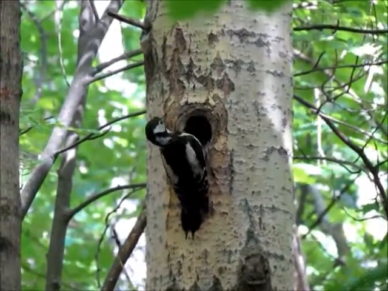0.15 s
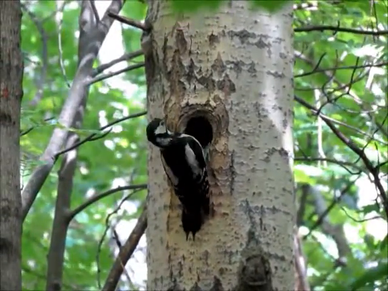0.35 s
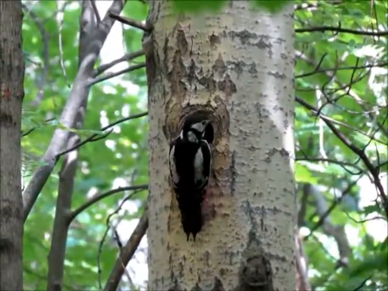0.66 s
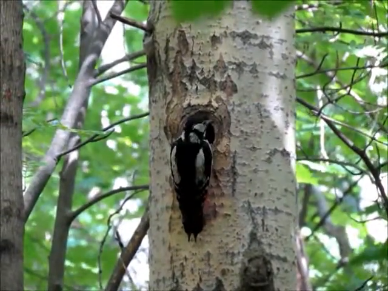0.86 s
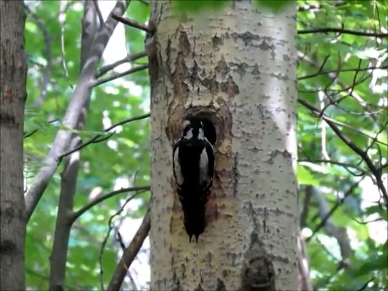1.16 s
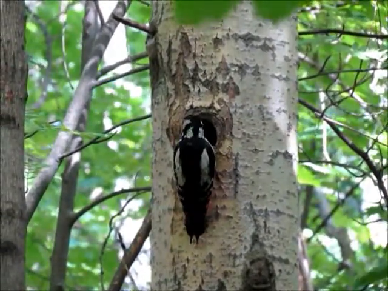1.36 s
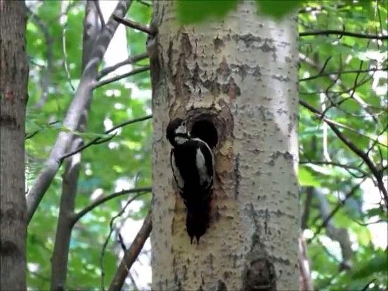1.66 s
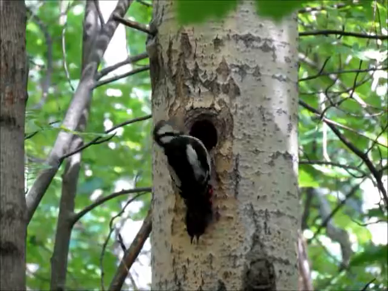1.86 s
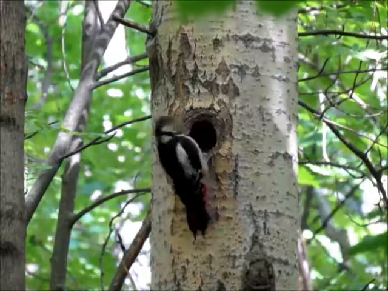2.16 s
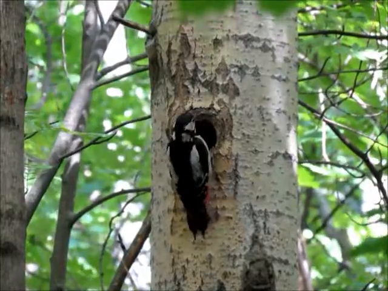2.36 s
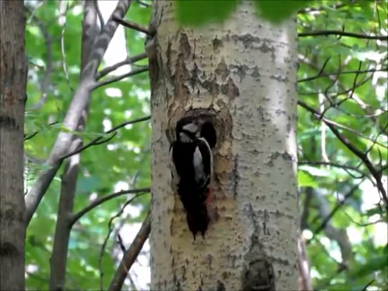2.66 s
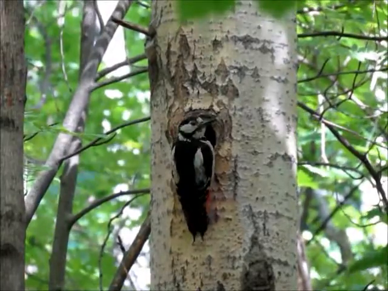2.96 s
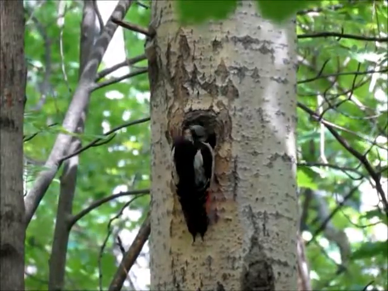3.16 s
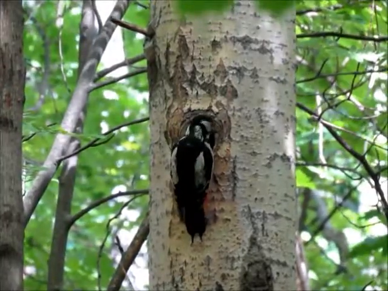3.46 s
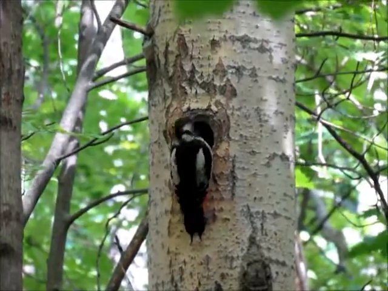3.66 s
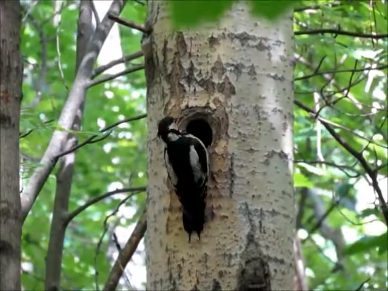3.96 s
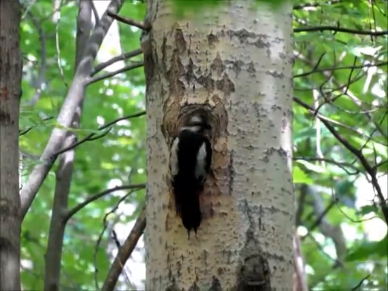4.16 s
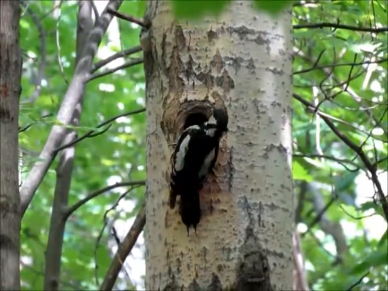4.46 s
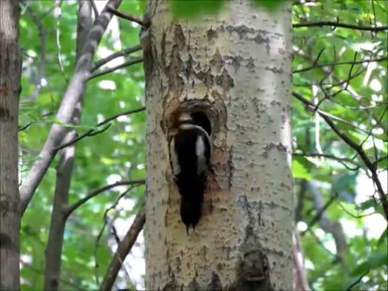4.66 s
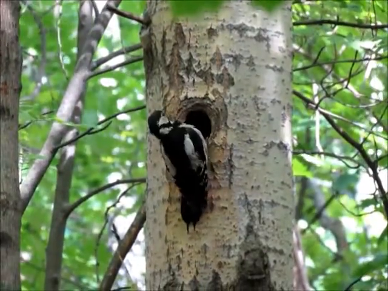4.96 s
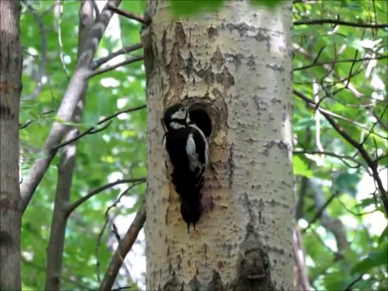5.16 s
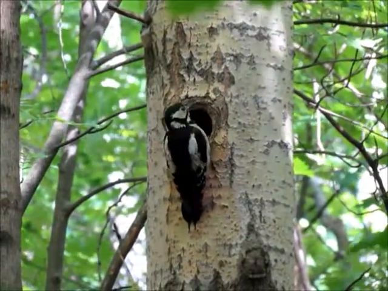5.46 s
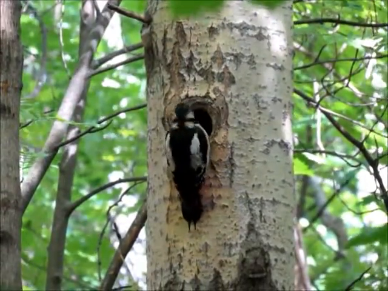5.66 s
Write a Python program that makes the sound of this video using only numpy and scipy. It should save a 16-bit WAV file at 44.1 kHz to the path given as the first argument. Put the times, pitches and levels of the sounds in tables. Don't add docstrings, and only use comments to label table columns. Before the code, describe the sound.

Two woodpecker nestlings beg without pause, each giving about six short, arched chirps a second, drifting in and out of step. A parent on the trunk adds a much louder, clipped call roughly every 0.6 to 1.1 seconds. Surrounding trunks return a brief, diffuse echo. Behind lies a soft, steady wash of distant traffic and leaves. Stereo microphone, birds near the centre, slightly left.

```python
import sys
import numpy as np
from scipy import signal
from scipy.fft import rfft, irfft
from scipy.io import wavfile
from scipy.ndimage import uniform_filter1d

SR = 44100
rng = np.random.default_rng(int(sys.argv[2]) if len(sys.argv) > 2 else 0)


def rack_gain(trim_db):
    fader = np.asarray(trim_db, float)
    return 10 ** (fader / 20)


def file_out(sig):
    cols = np.atleast_2d(sig).T
    lim = np.clip(cols, -1, 1)
    pcm = np.round(lim * 32767).astype(np.int16)
    wavfile.write(sys.argv[1], SR, pcm)


N = 256662


def wobble(n, hz):
    k = max(int(SR / hz), 1)
    smooth = uniform_filter1d(uniform_filter1d(rng.standard_normal(n), k), k)
    return smooth * np.sqrt(1.5 * k)


def bird(chirps, partials, arch, breath, rough, swell, grace_db=-99):
    rise_drop, fall_drop, deepest, flat = arch
    full, attack, silent, fade = breath
    jitter, shimmer_db, air_db, air_hz = rough
    out = np.zeros(N + SR)
    t = (np.arange(4096) - 2048) / SR
    n = len(t)
    for top_s, top_hz, rise, fall, db, effort_db in chirps:
        u = np.where(t < 0, t / rise, t / fall)
        drop = np.where(u < 0, rise_drop, fall_drop) * np.abs(u) ** flat
        tension = 1 - deepest * np.tanh(drop / deepest)
        hz = top_hz * tension
        phase = 2 * np.pi * np.cumsum(hz * (1 + jitter * wobble(n, hz=382))) / SR

        tone = np.zeros(n)
        for k, (partial_db, share) in enumerate(partials, 1):
            level = rack_gain(partial_db + share * effort_db + shimmer_db * wobble(n, hz=244))
            slack = tension ** (swell * (k - 1))
            in_range = k * hz < .4 * SR
            tone += level * slack * in_range * np.sin(k * phase)
        tone *= 1 + rack_gain(air_db) * wobble(n, hz=air_hz)
        tone *= np.clip((u - full) / attack + 1, 0, 1) ** 2
        tone *= np.clip((silent - u) / fade, 0, 1) ** 2

        lead = np.clip((-t - rise) / .022, 0, 1)
        grace_hz = top_hz * (.8 + .33 * lead + .03 * wobble(n, hz=500))
        grace = np.sin(2 * np.pi * np.cumsum(grace_hz) / SR) * np.sin(np.pi * lead ** .5)
        grace *= rack_gain(grace_db + 3.0 * wobble(n, hz=300))

        start = int(top_s * SR)
        out[start:start + n] += rack_gain(db) * (tone + grace)
    return out[2048:2048 + N]


def begging(bouts, rises, presses):
    chirps = []
    for bout, rise, (rest_db, lost_db, steep) in zip(bouts, rises, presses):
        for top_s, hz, length, effort_db in bout:
            db = rest_db - lost_db * (max(effort_db, 0) / 10) ** steep
            chirps.append((top_s, hz, rise * length, (1 - rise) * length, db, effort_db))
    return chirps


# pitch share, level in dB, turbulent air in dB, air bandwidth in Hz
CHICK_ROUGH = (.007, 2.2, -18, 7000)


def near_chick():
    # top of the arch in seconds, top pitch in Hz, length in seconds,
    # effort in dB that brightens the overtones
    eager = [(.1152, 2456, 0.064, 20), (.2694, 2480, .028, 16.5), (.4415, 2506, 0.041, 15),
             (.6147, 2506, 0.046, 13), (.7984, 2510, 0.049, 7), (.9719, 2634, 0.061, 12),
             (1.1532, 2633, 0.068, 10.5), (1.3448, 2543, 0.052, 11), (1.5177, 2517, 0.055, 10),
             (1.7027, 2669, 0.067, 13.5), (1.8855, 2663, .063, 13), (2.0698, 2645, .07, 15),
             (2.2511, 2612, 0.073, 12.5), (2.4311, 2630, 0.052, 9.5), (2.611, 2436, .04, 7.5),
             (2.7796, 2530, 0.045, 10.5), (2.9658, 2600, 0.039, 12)]
    tiring = [(3.1455, 2510, 0.055, 8), (3.3248, 2483, 0.049, 6.3), (3.5034, 2357, 0.052, -1.1),
              (3.6727, 2340, 0.029, 1.1), (3.85, 2586, 0.062, 10), (4.0227, 2576, .053, 10.5),
              (4.2034, 2608, 0.055, 11.5), (4.3867, 2635, 0.054, 8.5), (4.568, 2630, 0.061, 11.5),
              (4.7499, 2623, 0.064, 12.5), (4.9343, 2642, .07, 16), (5.1214, 2534, 0.055, 10),
              (5.306, 2513, 0.033, -0.5), (5.4818, 2348, .036, -7), (5.6472, 2487, 0.043, 13)]
    # level in dB, share of the effort it takes [0-1]
    partials = [(3, 0), (3.5, 0), (1, 0.74), (-10, 1), (-9.5, 0.56), (-20.5, 0.61)]
    chirps = begging((eager, tiring), rises=(.61, .48), presses=[(-36, 1.75, 1.14), (-37.5, 1.53, 1.4)])
    return bird(chirps, partials, arch=(.21, .33, .48, 2.5), breath=(-.75, .45, 2.2, 1.8),
                rough=CHICK_ROUGH, swell=1.9, grace_db=-10)


def deep_chick():
    # top of the arch in seconds, top pitch in Hz, length in seconds, effort in dB that
    # brightens the overtones; the chirps at .2945 and 3.0684 s are a third chick's
    eager = [(.122, 2710, 0.053, 8), (.2945, 2305, .025, 15), (.302, 2680, 0.066, 12.5),
             (.477, 2670, 0.077, 12), (.65, 2674, 0.073, 9.5), (.824, 2723, 0.069, 6.1),
             (.994, 2760, 0.06, 7.3), (1.176, 2740, 0.054, 9.4), (1.3601, 2800, 0.059, 12),
             (1.5265, 2756, 0.061, 9.1), (1.7012, 2627, 0.075, 23), (1.8841, 2674, 0.043, 19),
             (2.0351, 2660, 0.037, 9.5), (2.2122, 2710, 0.035, 6), (2.3908, 2760, 0.04, 5.7),
             (2.5632, 2714, 0.06, 4.3), (2.7435, 2817, 0.057, 3.8)]
    tiring = [(2.909, 2836, .055, 2), (3.0684, 2310, 0.025, 20), (3.0904, 2762, 0.057, 1),
              (3.2519, 2607, 0.067, 5), (3.42, 2486, 0.044, 0), (3.5859, 2460, 0.051, 0),
              (3.7824, 2290, .044, -5), (3.9403, 2380, .045, -4), (4.1286, 2270, 0.039, -5.5),
              (4.5239, 2520, 0.05, -4), (4.7014, 2404, 0.047, -7.2), (4.8905, 2443, .036, -7),
              (5.0496, 2415, 0.038, -4), (5.2266, 2328, 0.047, -10), (5.3934, 2580, .047, -1.5),
              (5.6006, 2587, 0.063, -2.5), (5.772, 2630, 0.056, 4.5)]
    # level in dB, share of the effort it takes [0-1]
    partials = [(-1.5, 0.071), (-0.5, 0.97), (-10.5, 1), (-23, 0.96), (-26, 0.93), (-44, .3)]
    chirps = begging((eager, tiring), rises=(.55, .47), presses=[(-37.5, 3.8, 2), (-37, 5.2, 2.1)])
    return bird(chirps, partials, arch=(.21, .33, .55, 3), breath=(-.7, .5, 1.5, .9),
                rough=CHICK_ROUGH, swell=2.4)


def parent_on_trunk():
    # top of the arch in seconds, top pitch in Hz, rise in seconds, level in dB, effort in dB
    calls = [
        (0.1632, 2267, 0.016, -16.5, -6.5),
        (1.306, 2352, .018, -17, -9.5),
        (2.2629, 2090, 0.025, -20.5, -7),
        (2.936, 2250, 0.015, -16.5, -5),
        (3.5334, 2397, 0.015, -16.5, -6),
        (4.2988, 2344, .018, -16, -10.1),
        (5.1788, 2299, 0.014, -17.5, -7),
        (5.8141, 2360, .014, -15.5, -7.5),
    ]
    # level in dB, share of the effort it takes [0-1]
    partials = [(0, 1), (0, 0), (-6, 1.0), (-28, .2), (-33, .2), (-37, .1)]
    fall_s = .0158
    chirps = [(top_s, hz, rise, fall_s, db, effort_db) for top_s, hz, rise, db, effort_db in calls]
    voice = bird(chirps, partials, arch=(.46, .46, .63, 3.5), breath=(-.3, 1.6, 1.5, .6),
                 rough=(.005, 2.6, -16.5, 16000), swell=.2)
    return signal.sosfilt(signal.butter(4, 2000, "high", fs=SR, output="sos"), voice)


def trunks(x, close, far_db, far_t60, far_hz, alike):
    near_db, build_s, near_t60, thin_hz = close
    t = np.arange(SR) / SR
    mid, side = rng.standard_normal((2, 2, SR))
    shared = np.sqrt(np.clip(alike, 0, 1)) * mid[:, None]
    apart = np.sqrt(np.clip(1 - alike, 0, 1)) * side[:, None] * np.array([[1], [-1]])
    ears = shared + apart
    near = rack_gain(near_db - 60 * t / near_t60) * ears[0] * np.clip(t / build_s, 0, 1) ** 2
    far = rack_gain(far_db - 60 * t / far_t60) * ears[1] * np.clip(t / 0.0061, 0, 1)
    far = signal.lfilter(*signal.butter(1, far_hz, fs=SR), far)
    echo = signal.lfilter(*signal.butter(2, thin_hz, "high", fs=SR), near + far)
    return signal.fftconvolve(x[None], echo, axes=1)[:, :N]


def on_log_axis(table, hz):
    f, v = np.transpose(table)
    return np.interp(np.log(np.maximum(hz, 1)), np.log(f), v)


def hush():
    # frequency in Hz, level in dB per Hz
    colour = [(15, -44), (25, -4), (64, -1), (349, 0), (848, 6), (1750, -7), (2490, -9.5), (3000, -11),
              (4500, -9), (5140, -11.5), (5580, -10), (7300, -13), (8350, -19.5), (11800, -24),
              (15500, -35)]
    # frequency in Hz, likeness of left and right [0-1]
    likeness = [(30, .8), (80, 0.82), (160, 0.63), (500, 0.46), (2000, 0.16), (12000, 0.13)]
    # frequency in Hz, left minus right in dB
    lean = [(30, 2.5), (200, 2), (700, 2.5), (1500, 0.7), (12000, 1.5)]
    hz = np.fft.rfftfreq(N, 1 / SR)
    mid, side = rfft(rng.standard_normal((2, N)))
    alike = np.clip(on_log_axis(likeness, hz), 0, 1)
    sign = np.array([[1], [-1]])
    ears = np.sqrt(1 + alike) * mid + sign * np.sqrt(1 - alike) * side
    ears = ears * rack_gain(sign * on_log_axis(lean, hz) / 2)
    rumble_db = 6 * np.exp(-(np.log(np.maximum(hz, 1) / 63) / 0.29) ** 2)
    out = irfft(ears * rack_gain(on_log_axis(colour, hz) + rumble_db), N)
    out = out * rack_gain(0.45 * wobble(N, hz=6.5))
    return out * rack_gain(-42.5) / np.sqrt(np.mean(out.mean(axis=0) ** 2))


def scene():
    chicks = near_chick() + deep_chick()
    parent = parent_on_trunk()
    # level dB, build-up s, t60 s, thin below Hz
    chick_echo = trunks(chicks, close=(-28, .006, .12, 1500),
                        far_db=-39.0, far_t60=0.32, far_hz=11000, alike=0.61)
    parent_echo = trunks(parent, close=(-24.5, .008, .14, 2600),
                         far_db=-34.5, far_t60=0.46, far_hz=13000, alike=0.8)
    direct = (chicks + parent) * rack_gain(np.array([[.15], [-.15]]))
    return direct + chick_echo + parent_echo + hush()


def band_limit(x):
    return signal.sosfilt(signal.butter(12, 15710, fs=SR, output="sos"), x)


def record(dry):
    return band_limit(dry)


dry = scene()
out = record(dry)
file_out(out)
```